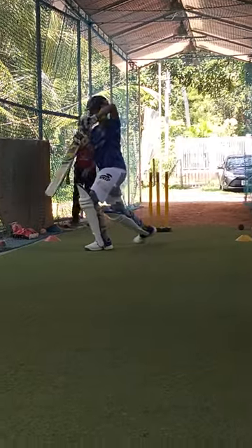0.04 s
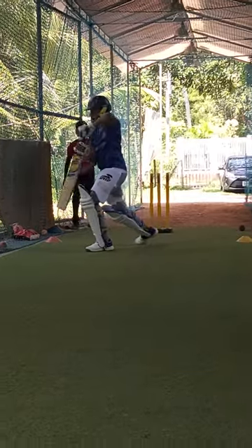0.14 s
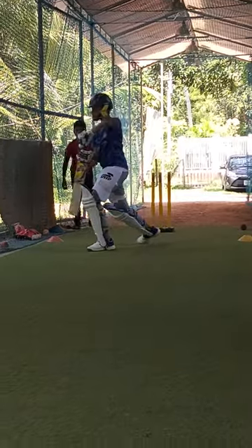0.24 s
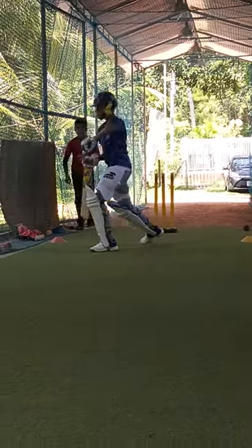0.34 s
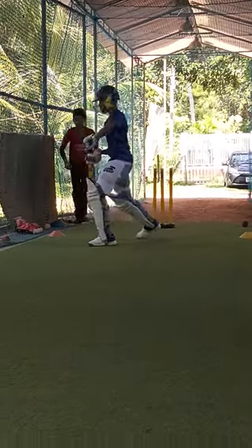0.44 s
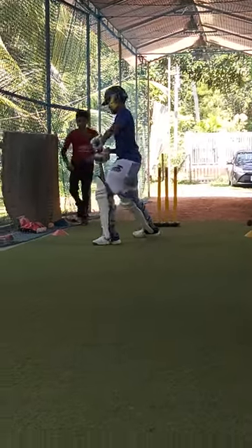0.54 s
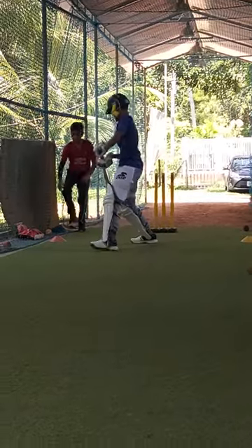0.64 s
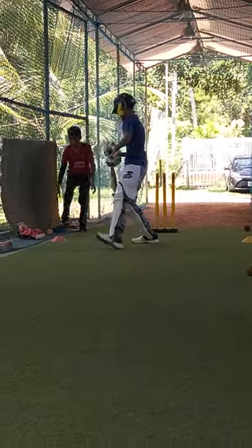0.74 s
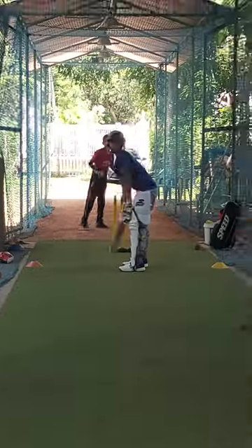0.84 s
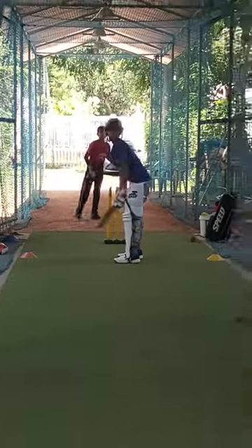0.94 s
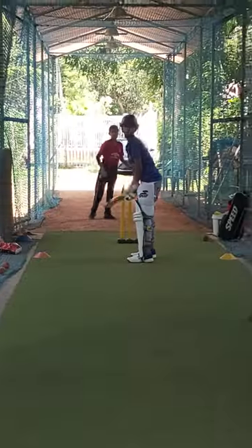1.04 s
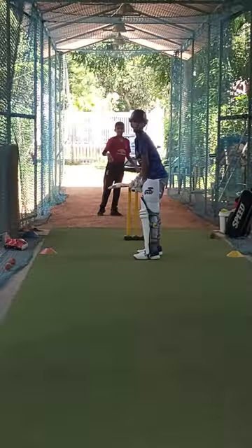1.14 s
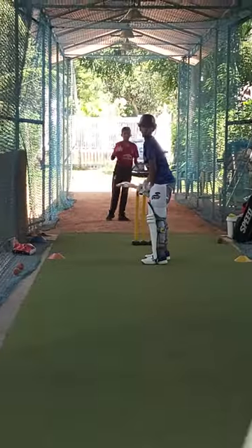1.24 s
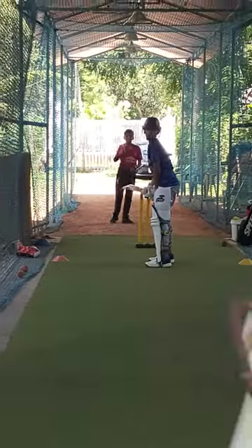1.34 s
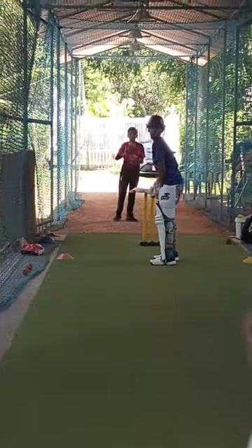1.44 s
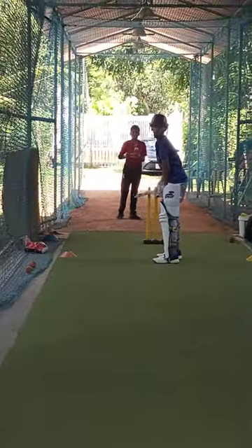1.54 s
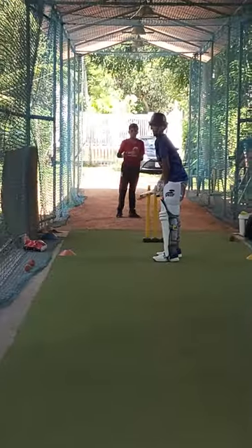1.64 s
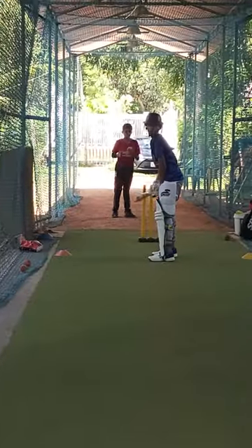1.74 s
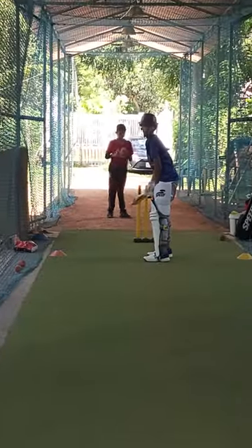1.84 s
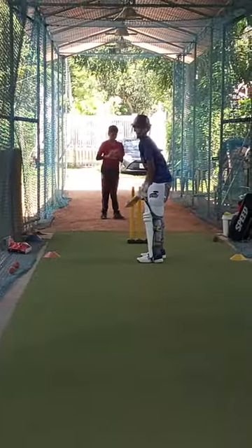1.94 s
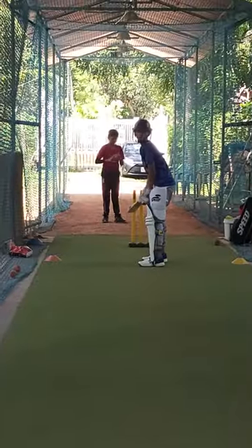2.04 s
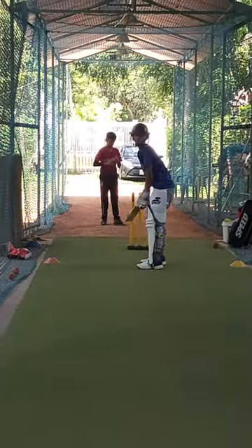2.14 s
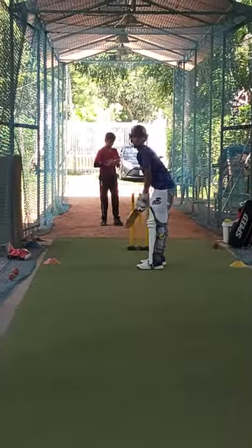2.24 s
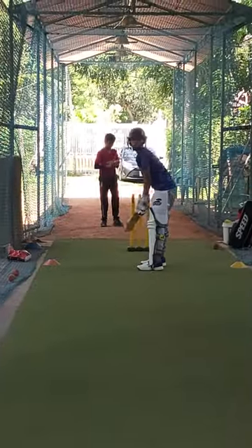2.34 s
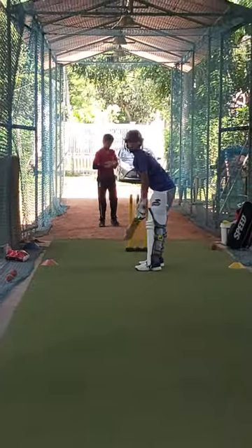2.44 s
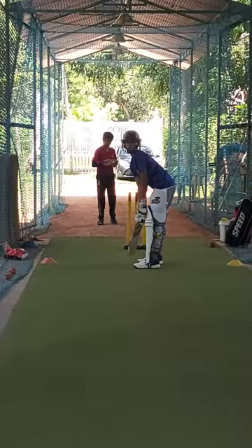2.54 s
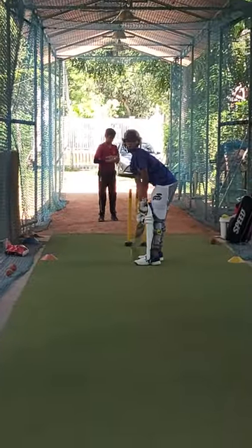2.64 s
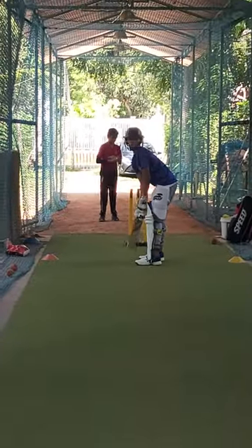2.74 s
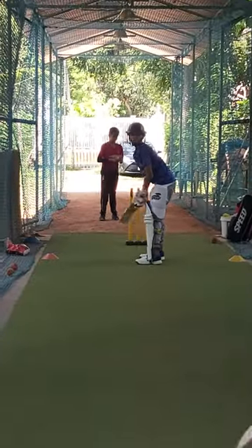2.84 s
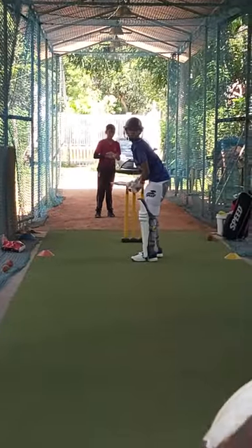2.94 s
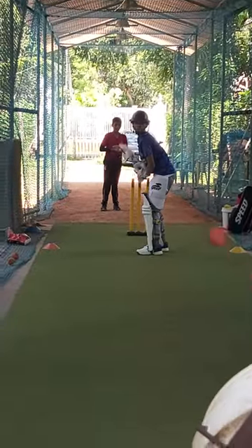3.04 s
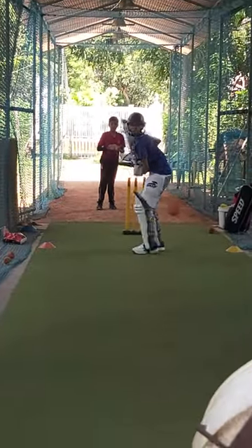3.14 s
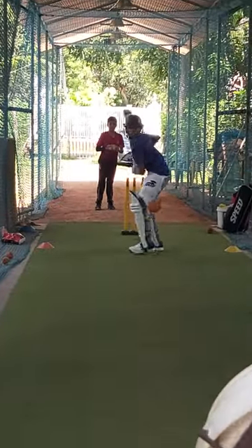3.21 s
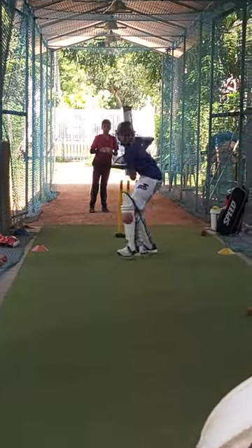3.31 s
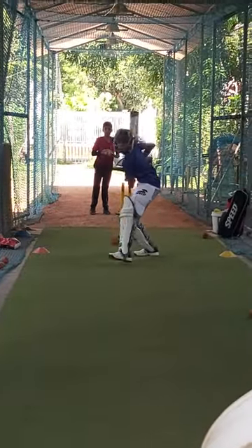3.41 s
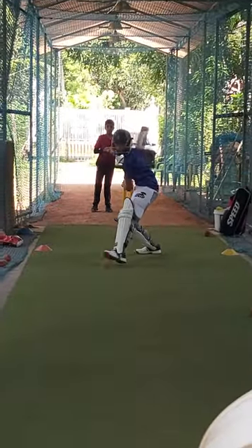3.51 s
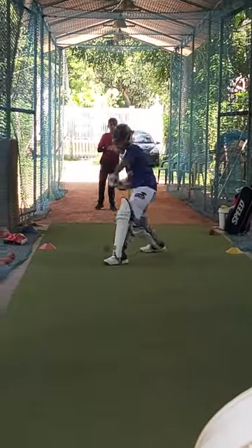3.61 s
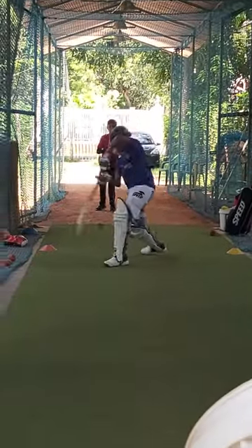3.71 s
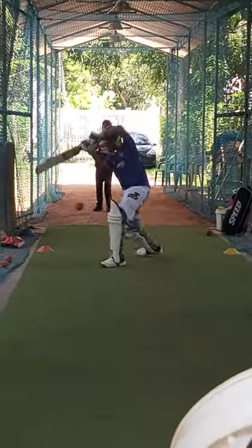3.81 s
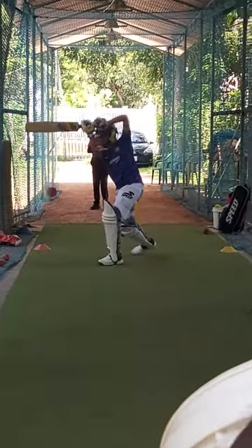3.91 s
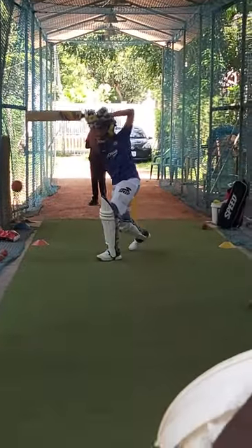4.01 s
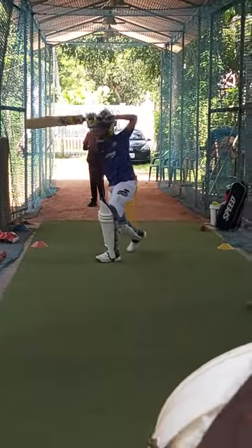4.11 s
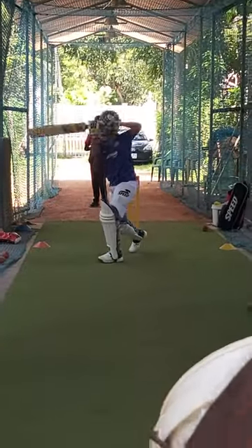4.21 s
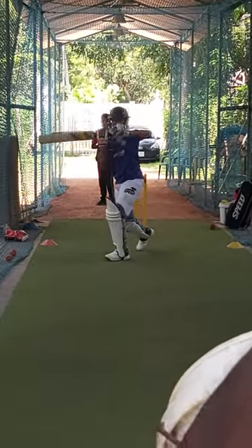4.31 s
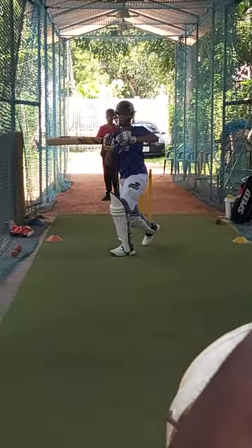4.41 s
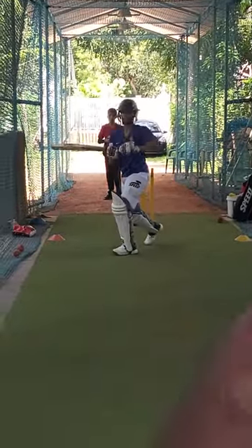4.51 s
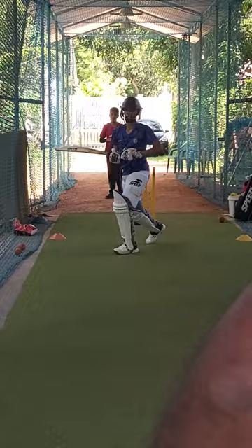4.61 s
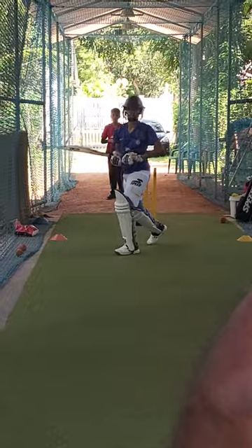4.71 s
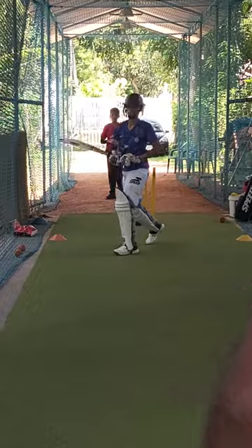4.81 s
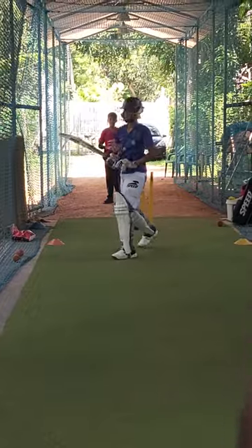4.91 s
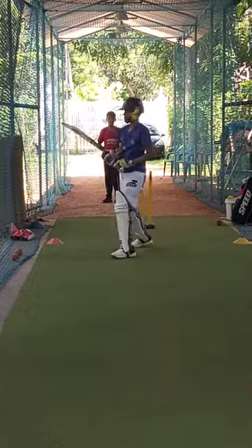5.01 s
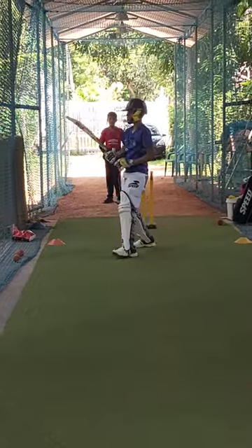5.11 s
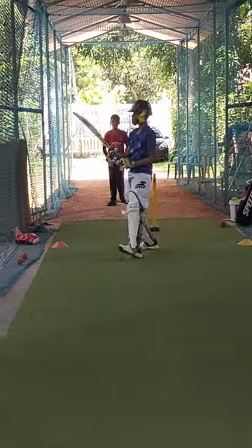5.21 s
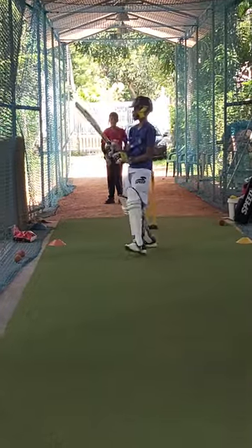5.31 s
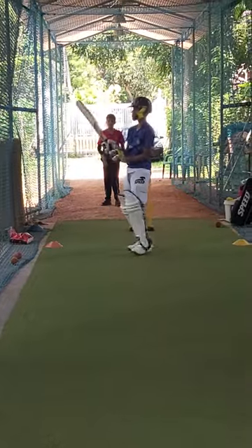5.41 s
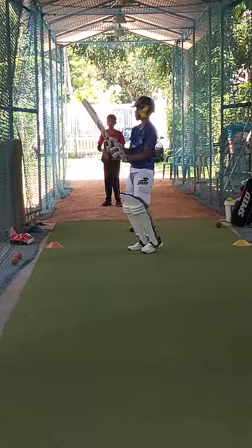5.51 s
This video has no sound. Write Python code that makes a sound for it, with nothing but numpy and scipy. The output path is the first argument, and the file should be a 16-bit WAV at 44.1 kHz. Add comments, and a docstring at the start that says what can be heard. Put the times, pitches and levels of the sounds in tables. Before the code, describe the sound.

From 0 to 0.9 s, high cicadas throb about ten times a second, loudest on the right, over dull footfalls on turf, faint cloth rustle, thin bird whistles and low rubbing near the phone. At 0.9 s the buzz abruptly drops, leaving a quieter background of leaves and distant traffic. Light gear clacks come at 1.1 and 2.05 s; a far bird hoots low and gives falling calls about once a second from 2.4 s. The bat taps the turf at 2.4 s, a thud follows at 2.7 s and a soft step at 3.1 s. The ball pitches at 3.63 s and is struck at 3.77 s, a loud, hard, woody crack ringing briefly under the roof. At 4.45 s a brightening scrape runs along netting, ending in a knock at 4.54 s. A quick falling swish and low, close thump come at 4.9 s, then rustling, rubbing, a swelling far engine drone and a soft final bump at 5.5 s.

```python
"""Cicadas throb, loudest on the right at first, over footfalls on turf in a roofed cricket net. The bat is tapped
on the turf, then a ball pitches and is driven with a loud crack that rings under the roof. It brushes along the
netting and drops close to the phone. Birds call far off, behind them distant traffic and leaves. Blows are decaying
modes plus a burst of noise, with a short hall tail; net, cloth, air and insects are shaped noise; calls are
blurred tones."""
import sys
import numpy as np
from scipy import signal
from scipy.fft import rfft, irfft
from scipy.io import wavfile
from scipy.ndimage import uniform_filter1d

SR = 44100
rng = np.random.default_rng(int(sys.argv[2]) if len(sys.argv) > 2 else 0)


def store_pcm(level_fs):
    """Save levels as 16-bit WAV."""
    pcm = np.round(np.clip(level_fs, -1, 1) * 32767).astype(np.int16)
    wavfile.write(sys.argv[1], SR, np.atleast_2d(pcm).T)


N = 245195
TIME = np.arange(N) / SR

# bat on ball: the blow, then quick early echoes off side boards and ground:
# t/s, level/dB, build-up/s, softness cut-off f/Hz, crack level/dB
DRIVE_BLOWS = [(3.7699, 1.5, 0.0002, 12000, -12.5), (3.7728, -16, 0.00024, 1200, -38),
               (3.775, -17, 0.00032, 900, -18), (3.7768, -11, 0.0011, 5000, 0)]
# ball stopped by the netting: t/s, level/dB, build-up/s, softness cut-off f/Hz, crack level/dB
NET_STOP_BLOWS = [(4.5432, 0, 0.00038, 6000, -28)]
# noise colour of the bat-tap and net-stop contacts: f/Hz, relative level/dB
TAP_COLOUR = [(200, 10.5), (800, -9.5), (2000, 9), (3000, -3), (3900, -4.5), (5000, -26.5), (7000, -16),
              (9000, -40), (16000, -41)]
# noise colour of duller, scuffing sounds: f/Hz, relative level/dB
SCUFF_COLOUR = [(200, 3.5), (800, 3.5), (1600, 1.5), (2700, -2), (4100, -9), (5500, -19.5), (8500, -26),
                (16000, -45)]
# colour of gritty rubbing: f/Hz, relative level/dB
RASP_COLOUR = [(150, -17), (600, -11.5), (1100, 0.5), (1600, -0.5), (2600, 3), (3400, -5), (4300, -6.5),
               (5000, -11.5), (6200, -16.5), (9000, -21), (16000, -29)]
# colour of the fine hiss on top of rubbing: f/Hz, relative level/dB
FIZZ_COLOUR = [(3000, -25), (6000, -9), (8500, -7.5), (11500, 6), (14000, -0.5), (16000, -4.5)]
# colour of the deep rumble, in traffic and beside the phone: f/Hz, relative level/dB
RUMBLE_COLOUR = [(20, -35), (35, -27), (55, 8), (70, 10.5), (115, 7), (160, 3), (300, -41.5)]
# colour of the low mids, in traffic and beside the phone: f/Hz, relative level/dB
BODY_COLOUR = [(80, 3.5), (160, -1.5), (330, 2), (480, -4.5), (800, -12), (1100, -11), (2000, -42)]


def undb(db):
    """Decibels to gain."""
    return 10 ** (np.asarray(db) / 20)


def unit(x):
    """Scale to rms 1."""
    return x / np.sqrt(np.mean(x ** 2))


def level_curve(rows):
    """Levels of a (t/s, level/dB) table, joined by straight lines in time."""
    s, db = np.transpose(rows)
    return np.interp(TIME, s, db)


def on_bins(points, size):
    """(f/Hz, value) points read at the bins of a transform."""
    hz, value = np.transpose(points)
    return np.interp(np.log(np.fft.rfftfreq(size, 1 / SR) + 1), np.log(hz), value)


def air(points, size=N, alike_hz=650):
    """Coloured stereo noise of rms 1; long waves reach both ports nearly alike."""
    mid, side = rfft(rng.standard_normal((2, size)))
    likeness = .85 / (1 + (np.fft.rfftfreq(size, 1 / SR) / alike_hz) ** 4)
    left_right_sign = np.array([[1], [-1]])
    pair = mid * np.sqrt(1 + likeness) + left_right_sign * side * np.sqrt(1 - likeness)
    return unit(irfft(pair * undb(on_bins(points, size)), size))


def walk(rate):
    """Smooth chance of rms 1 that changes about rate times a second."""
    size = max(int(SR / rate), 2)
    held = np.repeat(rng.standard_normal(N // size + 2), size)
    return unit(uniform_filter1d(held, size)[:N])


def wobble(width_hz, size=N):
    """Complex amplitude of a tone smeared over a narrow band."""
    hz = np.fft.fftfreq(size, 1 / SR)
    z = np.fft.ifft(np.exp(2j * np.pi * rng.random(size) - (hz / width_hz) ** 2 / 2))
    return z / np.sqrt(np.mean(abs(z) ** 2))


def glide(hz, width_hz):
    """A band of stereo noise of rms 1 that follows a pitch."""
    paths = np.array([wobble(width_hz), wobble(width_hz)])
    return unit(np.real(paths * np.exp(2j * np.pi * np.cumsum(hz) / SR)))


def swell(s, half_s):
    """A rounded rise and fall centred on time s, at half height half_s either side."""
    return 1 / (1 + ((TIME - s) / half_s) ** 4)


def low_cut(x, hz, order):
    """High-pass filter."""
    return signal.sosfilt(signal.butter(order, hz, "high", fs=SR, output="sos"), x)


def add(out, s, sound):
    """Mix a sound in at time s."""
    start = max(int(s * SR), 0)
    out[:, start:start + sound.shape[-1]] += sound[..., :N - start]


def decay(t, t60):
    """A fade of 60 dB in t60 seconds."""
    return np.exp(-np.log(1000) * t / t60)


def alike(events, touch):
    """Blows that differ only in time and strength."""
    return [(s, db, *touch) for s, db in events]


def strike(blows, modes, contact, crack_t60, pan_db=0):
    """Each row rings the modes and gives a short crack; a low softness cut-off leaves the high modes quiet."""
    out, t = np.zeros((2, N)), TIME[:SR // 2]
    for s, db, build, soft_hz, crack_db in blows:
        ring = 0
        for hz, mode_db, t60 in modes:
            softening = np.hypot(1, (hz / soft_hz) ** 2)
            ring = ring + undb(mode_db - 60 * t / t60) * np.sin(2 * np.pi * hz * t) / softening
        crack = air(contact, size=len(t)) * undb(crack_db) * decay(t, crack_t60)
        onset = 1 - np.exp(-(t / build) ** 2)
        ports_db = db + np.array([[pan_db], [-pan_db]]) / 2  # pan: left minus right
        add(out, s, (crack - ring) * onset * undb(ports_db))
    return out


def friction(rasp, fizz, grain_db=2.0, grain_rate=900, catch_db=4, catch_rate=260):
    """Fibres catch and slip: a gritty rasp with a fine fizz on top."""
    coarse, fine = (undb(grain_db * walk(grain_rate)) for _ in range(2))
    catches = undb(catch_db * walk(catch_rate))
    return rasp * unit(coarse * catches) * air(RASP_COLOUR) + fizz * unit(fine) * air(FIZZ_COLOUR)


def outdoors(rumble_db=-50, flicker_db=1):
    """Distant traffic, its body growing as an engine nears, and breeze in leaves, as wavering noise."""
    # low mids of the far traffic: t/s, level/dB
    traffic = [(0, -53.5), (.8, -54), (1.3, -57), (1.8, -54), (3.2, -54.5), (4.3, -51), (4.85, -45.5),
               (5.56, -44.5)]
    # breeze in the leaves: t/s, level/dB
    breeze = [(0, -57), (1.25, -56.5), (1.75, -52.5), (2.3, -54.5), (2.7, -51.5), (3.9, -47.5),
              (4.4, -52.5), (5.2, -43.5), (5.56, -46)]
    # colour of the leaves: f/Hz, relative level/dB
    leaf_colour = [(400, -14), (900, 8.5), (1300, 0), (2000, 1), (2700, -4), (3400, -12), (4200, -10.5),
                   (5300, -24.5), (8000, -32), (9000, -32), (13500, -26), (16000, -55)]
    layers = [(RUMBLE_COLOUR, rumble_db), (BODY_COLOUR, level_curve(traffic)),
              (leaf_colour, level_curve(breeze))]
    return sum(air(points) * undb(db + flicker_db * walk(14)) for points, db in layers)


def engine(centre_s=4.98, half_s=0.41, level_db=-48.5, width_hz=15):
    """A far engine's drone, a narrow band of noise, swells, fades and sinks in pitch."""
    hz = 375.5 - 16 * (TIME - centre_s)  # sinks 16 Hz a second
    return undb(level_db) * swell(centre_s, half_s) * glide(hz, width_hz)


def cicadas(throb_hz=10, throb_db=1.5, centre_hz=6950, sweep_hz=900, near_db=-3):
    """A throbbing chorus, a nearer buzz falling in pitch with each throb of the abdomen, and insect hiss."""
    # colour of the chorus, from the sound-making tymbals: f/Hz, relative level/dB
    tymbal_colour = [(4500, -27), (5900, -16), (6450, -5), (6900, -0.5), (7400, -4), (7900, -11.5),
                     (8600, -70), (11000, -49)]
    # colour of the broad insect hiss: f/Hz, relative level/dB
    hiss_colour = [(1800, -16), (3300, 0.5), (4400, -4), (5600, -9.5), (7500, -6), (9000, -23),
                   (13000, -20), (16000, -40)]
    # the insect hiss: t/s, level/dB
    hiss_level = [(0, -56), (.885, -59), (.895, -82), (2.3, -73), (3.1, -62.5), (5.56, -60)]
    # the song is stronger on the right until 0.89 s, then the right falls abruptly below the left
    right_db = np.where(TIME < 0.89, -46.5, -65.5)
    song_db = [np.full(N, -57), right_db]
    cycle = np.cumsum(throb_hz * (1 + 0.068 * walk(4))) / SR
    phase = 2 * np.pi * np.cumsum(centre_hz + sweep_hz * (.5 - cycle % 1)) / SR
    near = unit(np.real(np.array([wobble(190), wobble(260)]) * np.exp(1j * phase)))
    throb = undb(-throb_db * np.cos(2 * np.pi * cycle) + .5 * walk(23.74))
    song = unit((air(tymbal_colour) + undb(near_db) * near) * throb)
    return song * undb(song_db) + air(hiss_colour) * undb(level_curve(hiss_level))


def note(length, hz, sag, blur_hz):
    """A far bird note that loses a share sag of its pitch, blurred by its many paths through the trees."""
    u = np.linspace(0, 1, int(length * SR))
    phase = 2 * np.pi * np.cumsum(hz * (1 - sag + sag * (1 - u) ** 1.493)) / SR
    shared, left, right = (wobble(blur_hz, size=SR // 2)[:len(u)] for _ in range(3))
    direct = 2 / (1 + (blur_hz / 30) ** 2)  # rough notes have little pure core
    paths = (direct + shared + np.array([left, right])) / np.sqrt(2 + direct ** 2)
    return np.sqrt(np.abs(np.sin(np.pi * u))) * np.real(paths * np.exp(1j * phase))


def birds(call_blur_hz=27.8, whistle_blur_hz=71, chirp_blur_hz=145):
    """One far bird hoots and slurs low; smaller ones whistle and chirp above it, all as blurred tones."""
    # hoots on one low note: t/s, length/s, level/dB
    hoots = [(1.277, 0.35, -55.5), (1.749, 0.29, -54.5), (2.001, 0.2, -50.5), (2.899, 0.1, -52),
             (3.253, 0.163, -48), (3.997, 0.41, -53.5)]
    # the same bird's higher, falling call, about once a second: t/s, length/s, level/dB
    slurs = [(2.435, 0.32, -44), (3.4, 0.21, -43), (4.385, 0.212, -45), (5.374, 0.202, -41)]
    # thin level whistles: t/s, length/s, f/Hz, level/dB
    whistles = [(0.388, 0.22, 4300, -53.5), (0.652, 0.22, 4930, -57.5), (0.759, 0.14, 4200, -50)]
    # hoarse sinking chirps: t/s, length/s, f/Hz, level/dB
    chirps = [(0, 0.16, 3490, -56), (0.24, 0.35, 3730, -56), (0.37, 0.26, 2600, -56.5),
              (2.983, 0.26, 4030, -58.5), (3.485, 0.159, 2810, -49), (3.962, 0.11, 2720, -51),
              (4.116, 0.085, 2740, -54.5)]
    out = np.zeros((2, N))
    for s, length, db in hoots:
        add(out, s, undb(db) * note(length, 937, 0.0252, call_blur_hz))
    for s, length, db in slurs:
        add(out, s, undb(db) * note(length, 1036, 0.12, call_blur_hz))
    for s, length, hz, db in whistles:
        add(out, s, undb(db) * note(length, hz, 0, whistle_blur_hz))
    for s, length, hz, db in chirps:
        add(out, s, undb(db) * note(length, hz, 0.045, chirp_blur_hz))
    return out


def rubs(body_db=-2):
    """Movement beside the phone comes through as soft, low surges of noise."""
    # dull rubbing close to the phone: t/s, half length/s, level/dB
    rub_strokes = [(0.67, 0.052, -51), (0.839, 0.07, -45.5), (4.967, 0.089, -39), (5.27, 0.089, -41.5)]
    strokes = sum(undb(db) * swell(s, half) for s, half, db in rub_strokes)
    return strokes * (air(RUMBLE_COLOUR) + undb(body_db) * air(BODY_COLOUR))


def rustles(fizz_db=-17.5):
    """Strokes of cloth and shoes, whose fibres rasp with a fainter fizz."""
    # brushing strokes: t/s, half length/s, level/dB
    brush_strokes = [(0.04, 0.003, -45.5), (0.486, 0.16, -57), (0.808, 0.049, -51), (4.916, 0.019, -38.5),
                     (5.18, 0.094, -48), (5.292, 0.0066, -37)]
    strokes = sum(undb(db) * swell(s, half) for s, half, db in brush_strokes)
    return friction(strokes, strokes * undb(fizz_db))


def gear_clacks():
    """Light clacks of the batter's gear, short high modes with a faint crack."""
    # clacks: t/s, level/dB
    clack_events = [(1.068, 4.5), (1.09, 5), (1.108, 0.5), (2.046, 4)]
    # modes of the gear: f/Hz, level/dB, t60/s
    gear_modes = [(1830, -58, 0.047), (1915, -45.5, 0.027), (2070, -48, 0.031), (2260, -52, 0.026)]
    touch = (0.0011, 9000, -49.5)  # build-up/s, softness cut-off f/Hz, crack level/dB
    return strike(alike(clack_events, touch), gear_modes, SCUFF_COLOUR, crack_t60=0.053)


def turf_thuds():
    """Thuds and footfalls on turf, low damped modes with a scuff of noise."""
    # thuds: t/s, level/dB, build-up/s, softness cut-off f/Hz, crack level/dB
    thuds = [(2.6745, 0.5, 0.0012, 2000, -40.5), (2.725, -17.5, 0.0036, 2000, -20.5)]
    # footfalls: t/s, level/dB
    steps = [(.04, -22), (.215, -20), (.42, -20.5), (.79, -20), (1.015, -32), (3.115, -19)]
    # modes of the turf: f/Hz, level/dB, t60/s
    turf_modes = [(94.5, -33, 0.2), (183, -19.5, 0.072), (307.7, -21, 0.12), (362, -13.5, 0.036),
                  (483, -20.5, 0.034), (630, -24, 0.023), (770, -44, 0.021), (1820, -37, .03)]
    step_touch = (0.0046, 900, -24)  # build-up/s, softness cut-off f/Hz, crack level/dB
    return strike(thuds + alike(steps, step_touch), turf_modes, SCUFF_COLOUR, crack_t60=0.091)


def bat_taps():
    """The bat tapped on the turf, a few contacts ringing its damped modes."""
    # taps: t/s, level/dB, build-up/s, softness cut-off f/Hz, crack level/dB
    tap_blows = [(2.4128, -12, 0.00056, 1200, -23), (2.4218, 0, 0.0021, 455, -32),
                 (2.4248, -7.5, 0.000086, 4000, -13), (2.4283, 4, 0.00065, 2480, -33.5)]
    # modes heard in the taps: f/Hz, level/dB, t60/s
    tap_modes = [(200, -17.5, 0.027), (355, -11, 0.013), (470, -35, 0.087), (759, -22, 0.058),
                 (935, -10, 0.015), (980, -39, 0.028), (1516, -23.5, 0.03), (2130, -23, 0.017),
                 (2810, -33, 0.031)]
    return strike(tap_blows, tap_modes, TAP_COLOUR, crack_t60=0.037, pan_db=-2.5)


def ball_pitch():
    """The ball pitches on the turf, damped modes with a scuff of noise."""
    # the pitching ball: t/s, level/dB, build-up/s, softness cut-off f/Hz, crack level/dB
    pitch_blows = [(3.628, 2.5, 0.00063, 9000, -36.5), (3.636, -7.5, 0.00029, 9000, -21.5),
                   (3.652, -8, 0.0048, 9000, -20)]
    # modes heard as the ball pitches: f/Hz, level/dB, t60/s
    pitch_modes = [(316, -34.5, 0.11), (784, -26.5, 0.032), (1050, -48, .018), (1558, -31, 0.044),
                   (2600, -35.5, 0.037)]
    return strike(pitch_blows, pitch_modes, SCUFF_COLOUR, crack_t60=0.065)


def net_brush(touch_s=4.447, release_s=0.014, rasp_power=1.2, fizz_power=2.7, snag_fizz_db=-16):
    """The scrape grows louder and brighter as the mesh tightens, and lets go when the ball stops; knots snap past."""
    # knots of the mesh that snag on the ball: t/s, level/dB
    knots = [(4.451, -38.5), (4.464, -36), (4.474, -30), (4.498, -32.5), (4.519, -28.5)]
    stop_s = NET_STOP_BLOWS[0][0]
    release = np.exp(-np.maximum(TIME - stop_s, 0) / release_s)
    tension = np.interp(TIME, [touch_s, stop_s], [0, 1]) * release
    sway = swell(stop_s + 0.11, 0.08)  # the slack net sways after the stop
    rasp = undb(-29.5) * tension ** rasp_power + undb(-48) * sway
    fizz = undb(-35) * tension ** fizz_power + undb(-56.5) * sway
    snags = sum(undb(db) * swell(s, 0.0026) for s, db in knots)
    return friction(rasp, fizz) + snags * (air(RASP_COLOUR) + undb(snag_fizz_db) * air(FIZZ_COLOUR))


def net_stop():
    """The netting stops the ball, a short blow ringing damped modes."""
    # modes heard at the stop: f/Hz, level/dB, t60/s
    net_modes = [(130, -42, .05), (319, -5.5, 0.014), (430, -39, .03), (835, -21.5, 0.027),
                 (1500, -17.5, 0.016), (2050, -42, 0.018), (2600, -43, 0.014)]
    return strike(NET_STOP_BLOWS, net_modes, TAP_COLOUR, crack_t60=0.02, pan_db=-1.5)


def swish(centre_s=4.908, shape_s=0.025, slide_db=-44.5, fizz_db=-49, width_hz=650):
    """A quick slide of band noise that sinks in pitch just before the drop, with fizz on top."""
    octaves = np.clip(43 * (centre_s - TIME), -2, 1)  # falls 43 octaves a second
    slide = undb(slide_db) * glide(3000 * 2 ** octaves, width_hz)
    return swell(centre_s, shape_s) ** 2 * (slide + undb(fizz_db) * air(FIZZ_COLOUR))


def ball_drops():
    """A soft low rumble under the swish, then the ball drops close to the phone: low modes with a soft scuff."""
    # a soft low rumble under the swish, then the ball's contacts:
    # t/s, level/dB, build-up/s, softness cut-off f/Hz, crack level/dB
    drop_blows = [(4.886, -22.5, 0.0046, 1500, -33), (4.929, -17.5, 0.0011, 3000, -16),
                  (4.9345, 7, 0.014, 1500, -44), (5.503, -6, 0.012, 900, -40)]
    # modes of the mat: f/Hz, level/dB, t60/s
    mat_modes = [(55, -36, 0.17), (160.5, -15, 0.079), (192.2, -1.5, 0.046), (217.5, -3, 0.044),
                 (336, -21, 0.072), (730, -7, 0.016)]
    return strike(drop_blows, mat_modes, SCUFF_COLOUR, crack_t60=0.057, pan_db=2.0)


def hall(x, build_s=0.0082):
    """Roof, turf and side boards scatter the sound into a short tail, each band with its own decay."""
    # reverberation under the roof: f/Hz, relative level/dB, t60/s
    tail_bands = [(90, -9, 0.27), (200, -5, 0.35), (380, -7.5, 0.47), (760, -5, 0.38), (1100, -6.5, 0.49),
                  (1500, 0.5, 0.34), (1950, -4, .33), (2700, 3.5, 0.39), (5000, -0.5, 0.45),
                  (8700, 4, 0.42), (14200, 2, 0.27)]
    t = TIME[:SR]
    noise, response = rfft(air([(20, 0), (20000, 0)], size=SR)), 0
    for k, (_, db, t60) in enumerate(tail_bands):
        band = on_bins([(row[0], j == k) for j, row in enumerate(tail_bands)], SR)
        response = response + irfft(noise * band, SR) * undb(db) * decay(t, t60)
    response = response * (1 - np.exp(-(t / build_s) ** 4))
    response = response / np.sqrt(np.sum(response ** 2) / 2)
    return signal.fftconvolve(x.mean(axis=0)[None], response, axes=1)[:, :N]


def hall_ring(level_db=-37, build_s=0.012):
    """After the drive the roofed hall rings on in decaying tones, strongest near 309 Hz."""
    # tones that ring on: f/Hz, relative level/dB, t60/s
    ring_tones = [(309, 22.5, 0.17), (517, 5, 0.34), (1531, -1, 0.22), (1660, 2, 0.27), (1780, 2, 0.24),
                  (1983, -5, .2), (2460, 0, 0.27), (2845, 0, .25)]
    out, t = np.zeros((2, N)), TIME[:SR]
    for hz, db, t60 in ring_tones:
        phase = 2 * np.pi * rng.random() + np.array([[0], [1]])  # ports 1 rad apart
        envelope = (1 - np.exp(-(t / build_s) ** 2)) * decay(t, t60)
        add(out, DRIVE_BLOWS[0][0], undb(level_db + db) * envelope * np.sin(2 * np.pi * hz * t + phase))
    return out


def bat_drive():
    """Bat drives ball: damped modes and a loud crack, then early echoes; the narrow blade radiates little bass."""
    # modes heard in the drive: f/Hz, level/dB, t60/s
    drive_modes = [(187.9, -11.5, 0.04), (320, -14, 0.062), (380, -8, 0.025), (560, -9.5, 0.021),
                   (730, -6.5, 0.015), (1320, -19.5, 0.043), (1520, -17.5, 0.037), (1855, -13, 0.019),
                   (2694, -21, 0.035), (5600, -42, 0.0071)]
    # noise colour of the contact with willow: f/Hz, relative level/dB
    willow_colour = [(200, -21), (700, -0.5), (1900, -1.5), (2800, -16.5), (3800, -13.5), (6000, -19),
                     (8000, -23.5), (11500, -21.5), (16000, -25)]
    blows = strike(DRIVE_BLOWS, drive_modes, willow_colour, crack_t60=0.027, pan_db=-0.3)
    return low_cut(blows, 174, order=2)


def scene():
    """Blows at the crease fill the hall; the taps and the sounds near the phone stay drier."""
    background = outdoors() + engine() + cicadas() + birds() + rubs()
    brushing = rustles() + net_brush() + swish()
    clacks, thuds, taps, pitch = gear_clacks(), turf_thuds(), bat_taps(), ball_pitch()
    stop, drops, drive = net_stop(), ball_drops(), bat_drive()
    # levels sent to the hall
    far = undb(-1.5) * drive + undb(2.5) * thuds + undb(0.5) * (pitch + clacks)
    near = undb(-10.5) * taps + undb(-4.5) * (stop + drops) + undb(-5.5) * brushing
    direct = drive + taps + thuds + pitch + clacks + stop + drops + brushing
    return direct + hall_ring() + hall(far + near) + background


def record(dry):
    """The right port is fuller, the left brighter; deep bass and top are cut, peaks past full scale clip."""
    # difference between the microphone ports: f/Hz, left minus right level/dB
    port_tilt = [(60, -7), (200, -5.5), (400, -7), (700, -1.5), (1300, -6), (2500, -6), (4400, 5.5),
                 (7000, 9.5), (10000, 0), (15000, 1)]
    tilt_db = on_bins(port_tilt, N) / 2
    ports = irfft(rfft(dry) * undb([tilt_db, -tilt_db]), N)
    clipped = np.clip(low_cut(ports, 58, order=3), -1, 1)
    top_cut = signal.ellip(8, .2, 70, 15800, fs=SR, output="sos")
    return signal.sosfilt(top_cut, clipped)


dry = scene()
out = record(dry)
store_pcm(out)
```